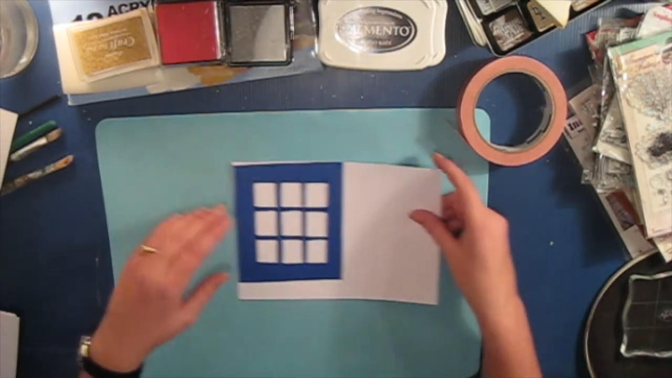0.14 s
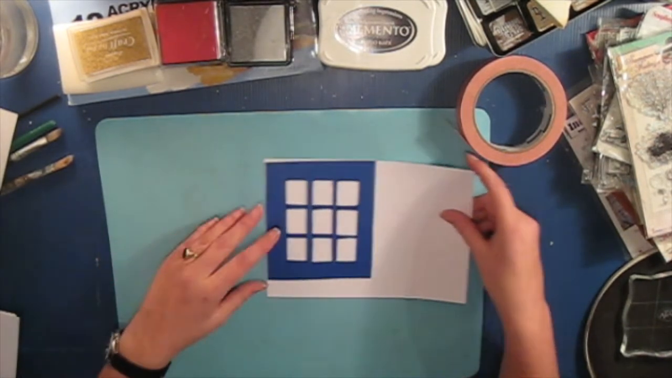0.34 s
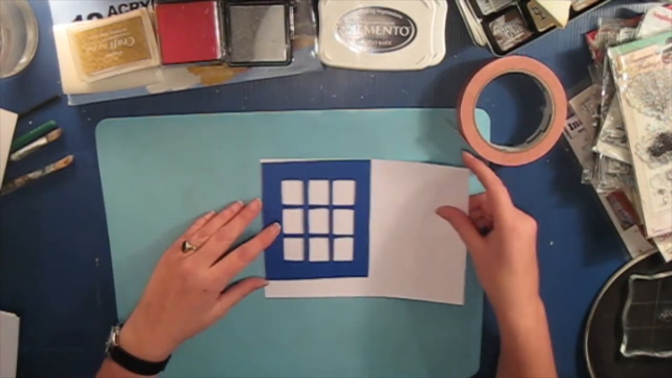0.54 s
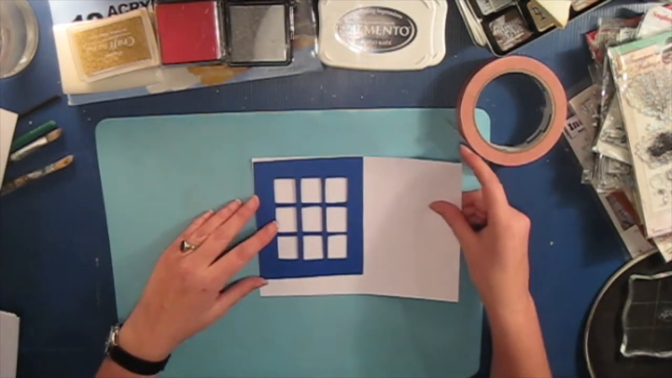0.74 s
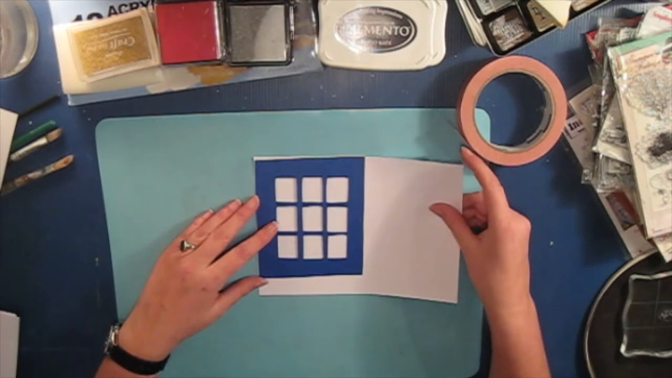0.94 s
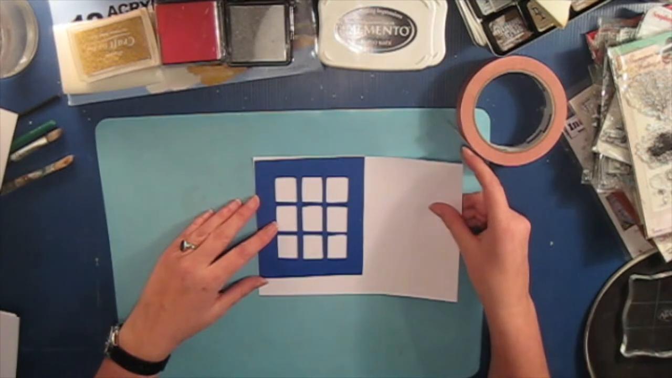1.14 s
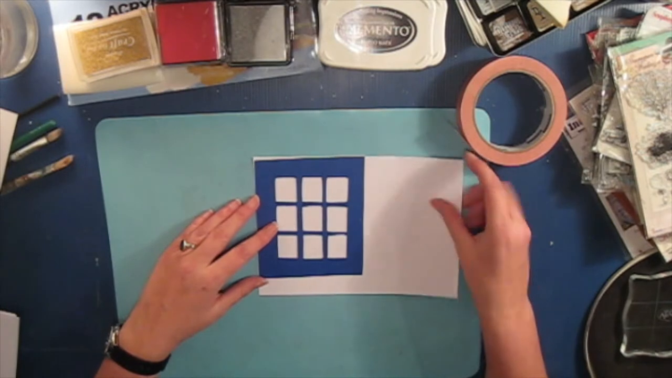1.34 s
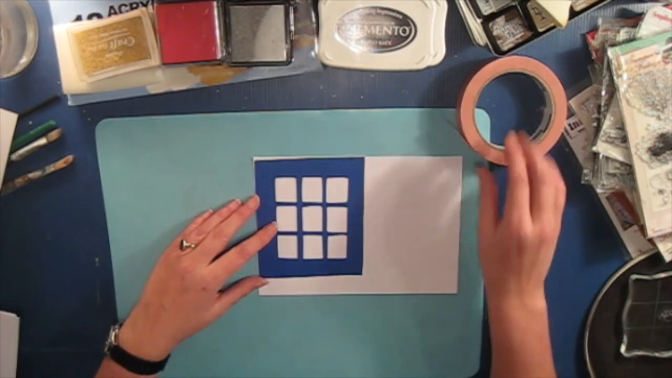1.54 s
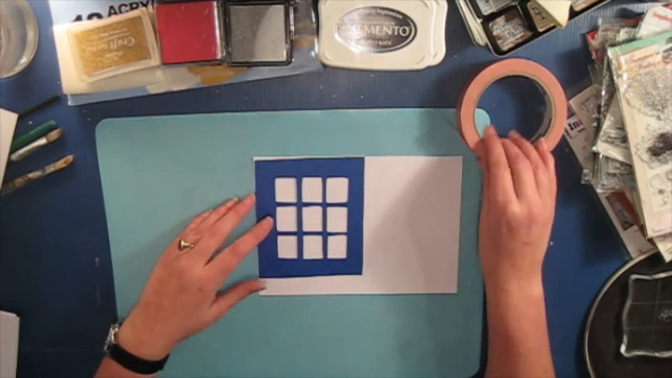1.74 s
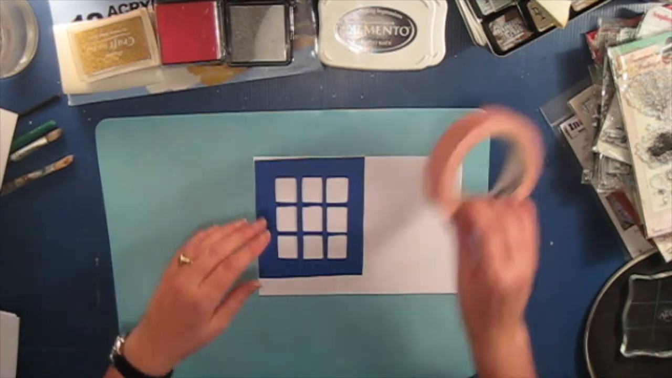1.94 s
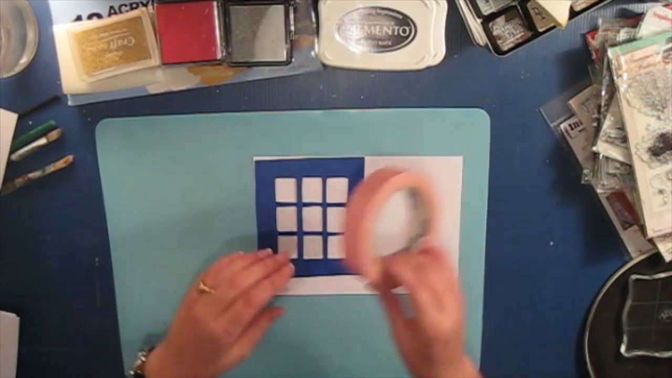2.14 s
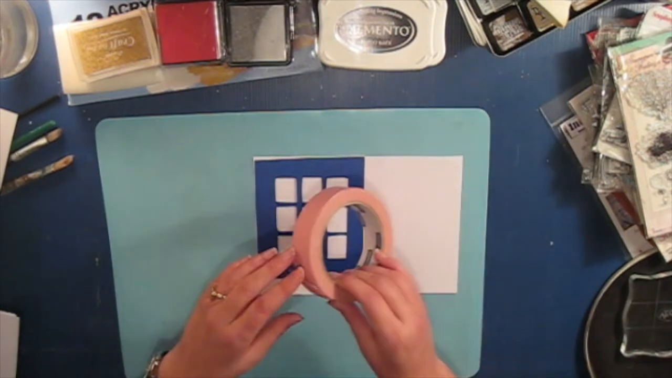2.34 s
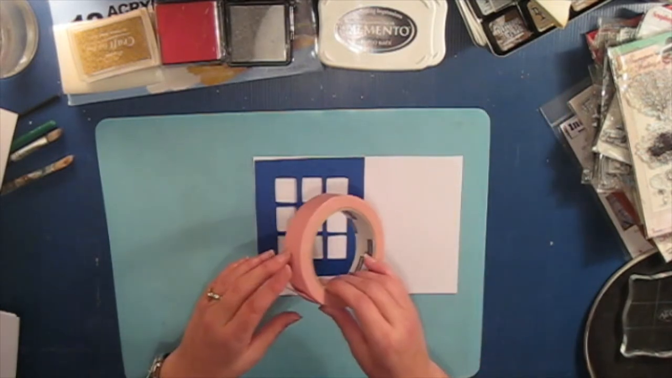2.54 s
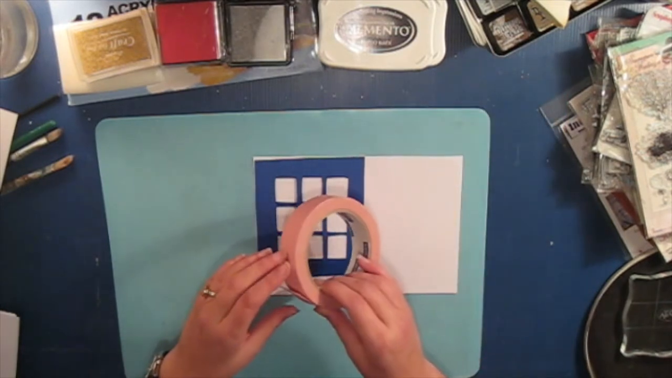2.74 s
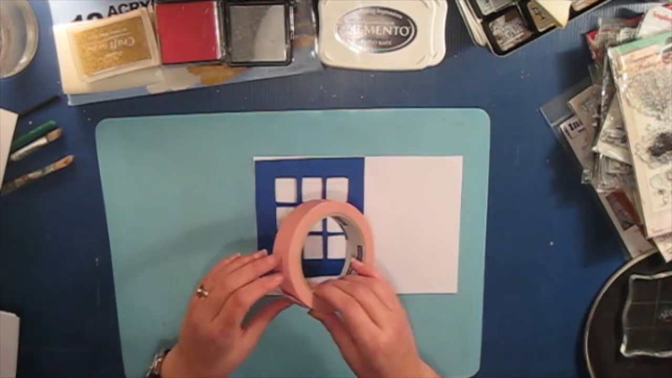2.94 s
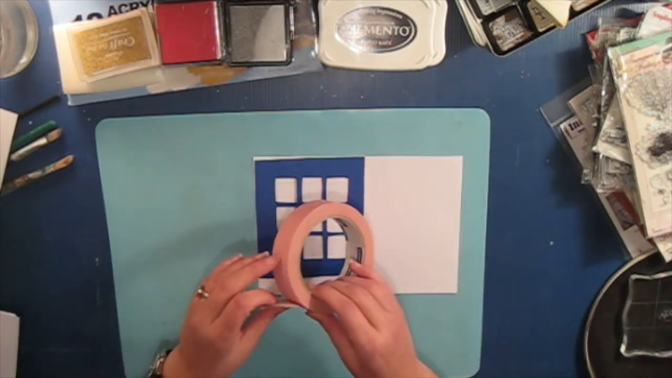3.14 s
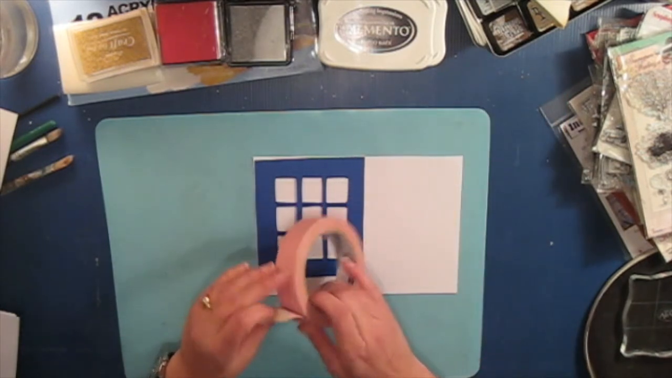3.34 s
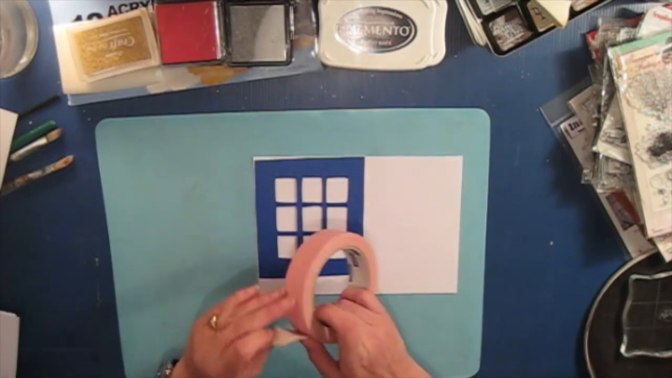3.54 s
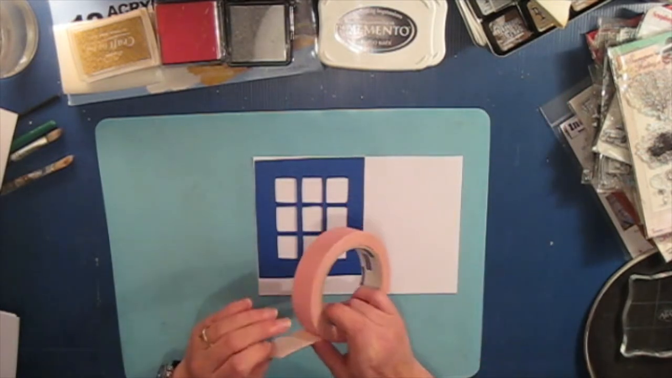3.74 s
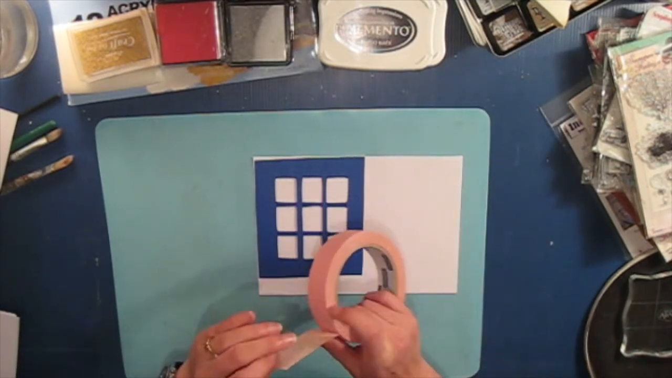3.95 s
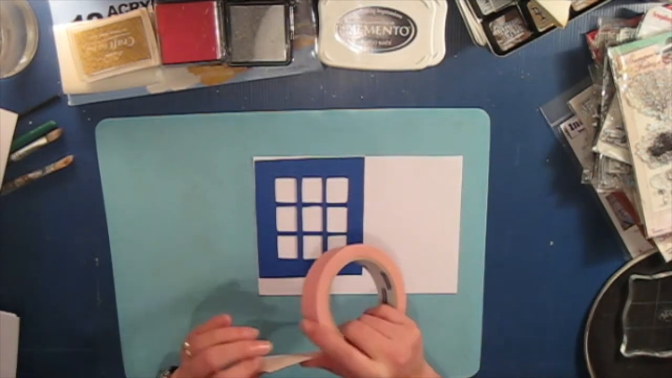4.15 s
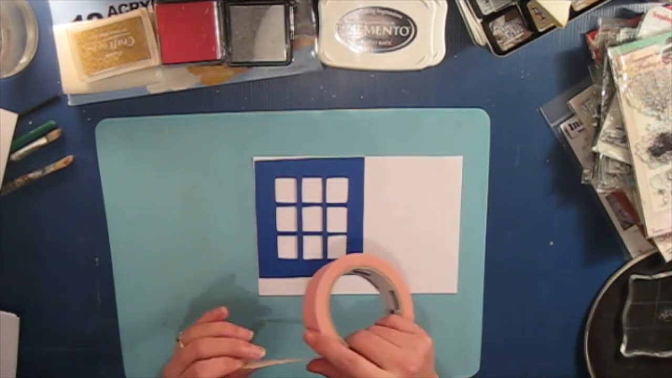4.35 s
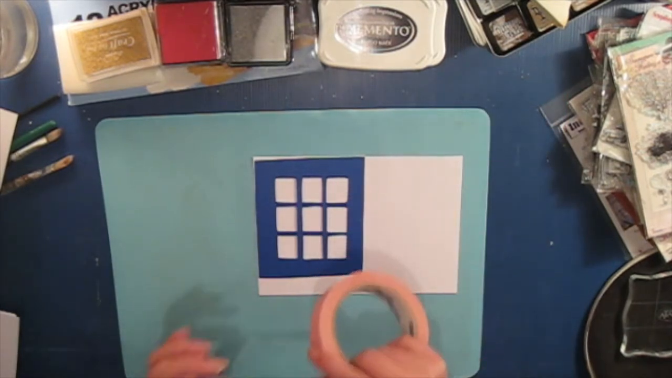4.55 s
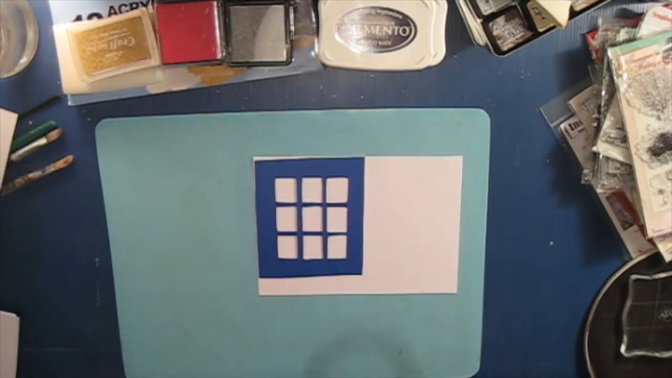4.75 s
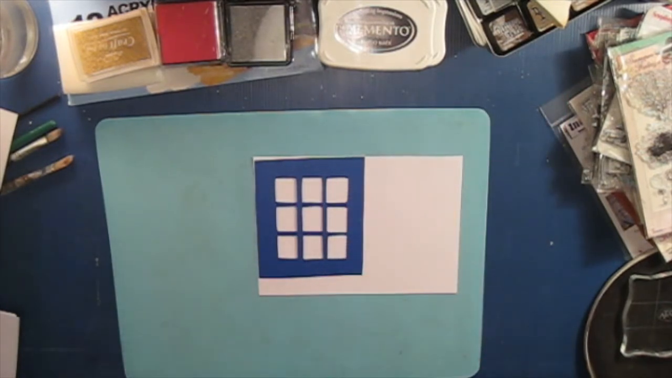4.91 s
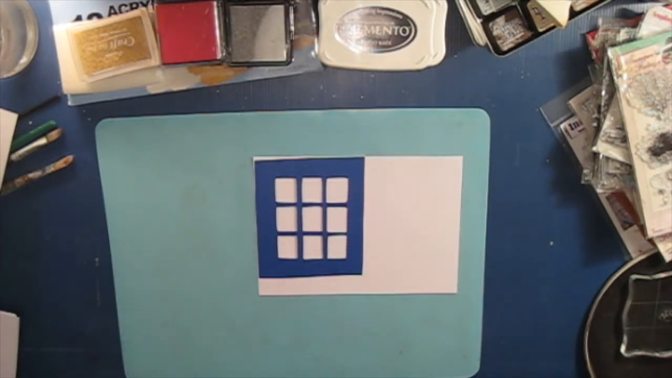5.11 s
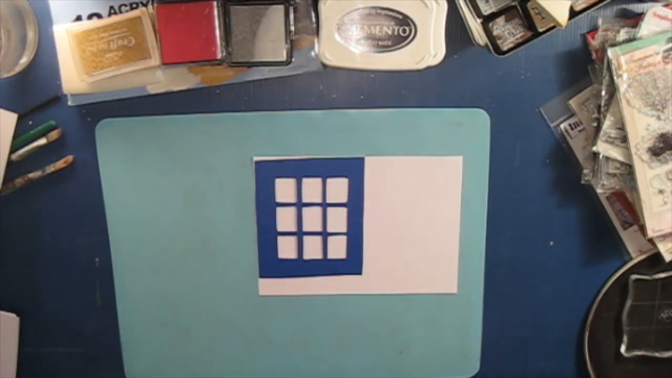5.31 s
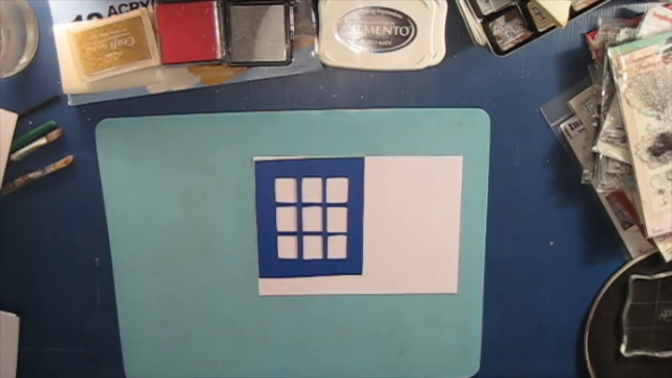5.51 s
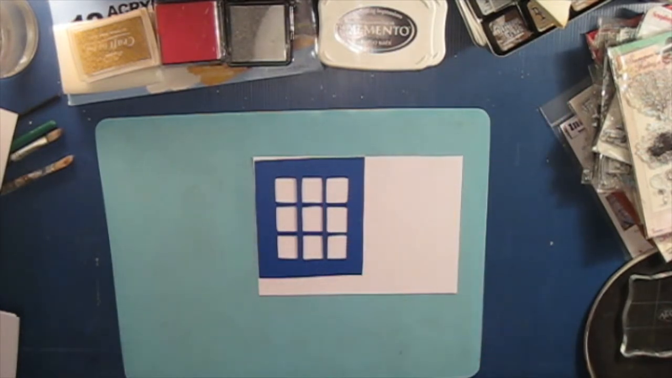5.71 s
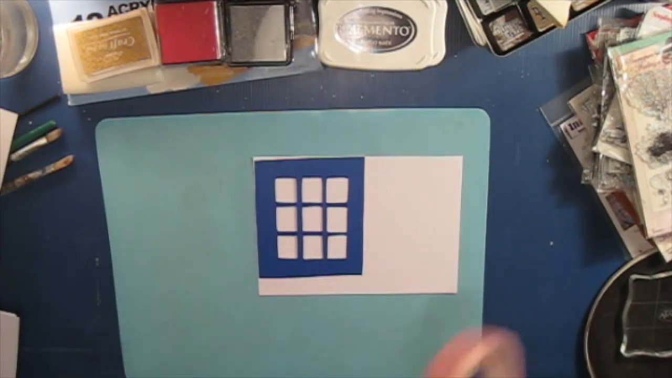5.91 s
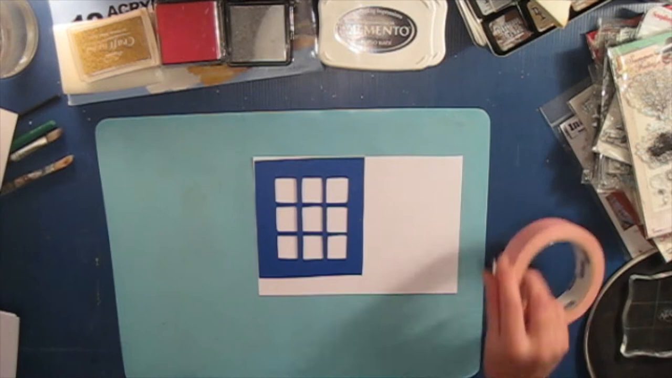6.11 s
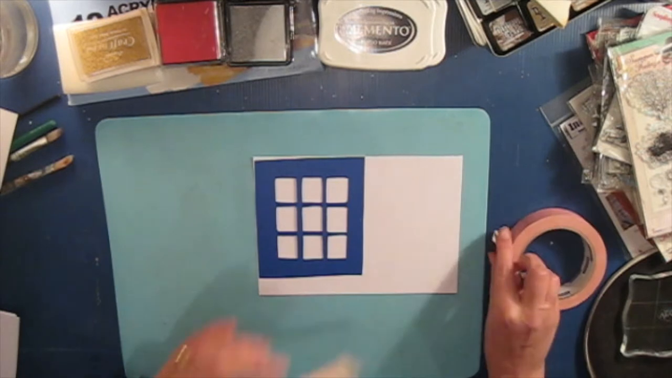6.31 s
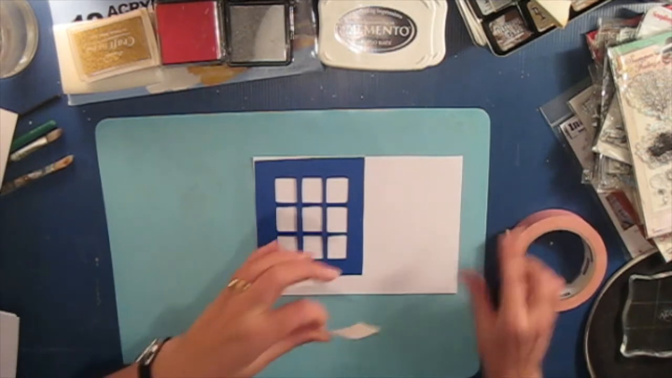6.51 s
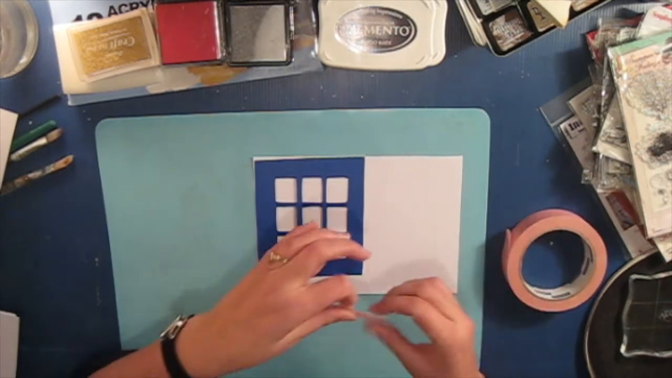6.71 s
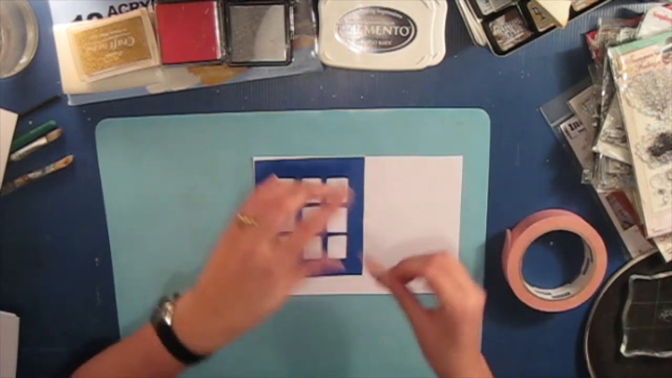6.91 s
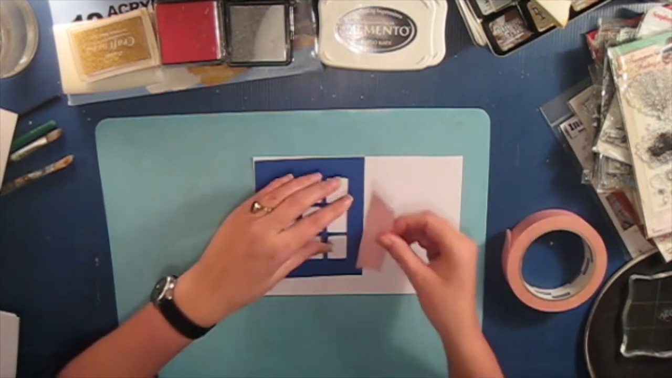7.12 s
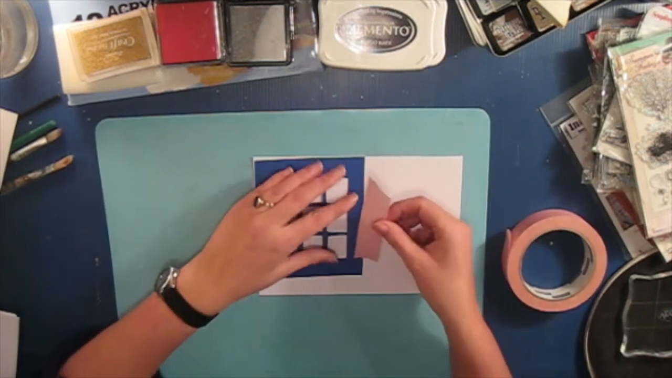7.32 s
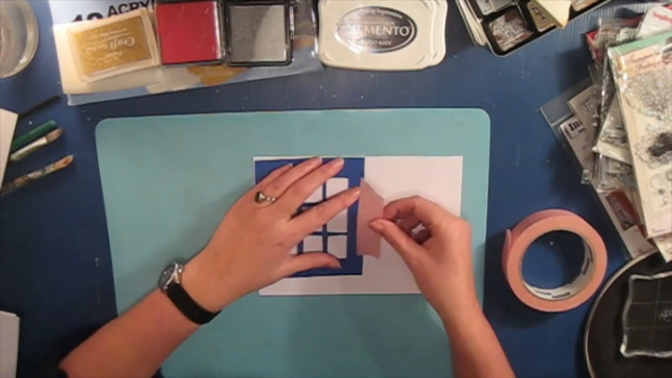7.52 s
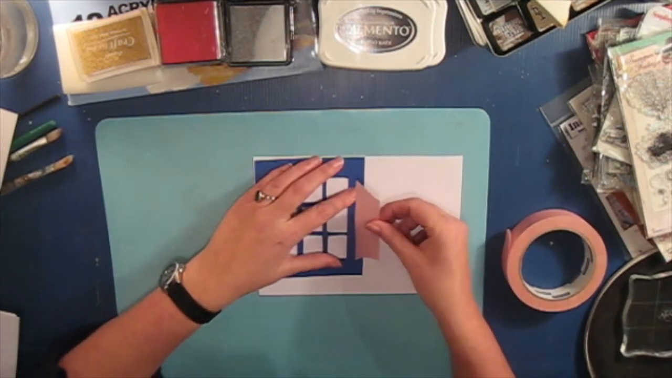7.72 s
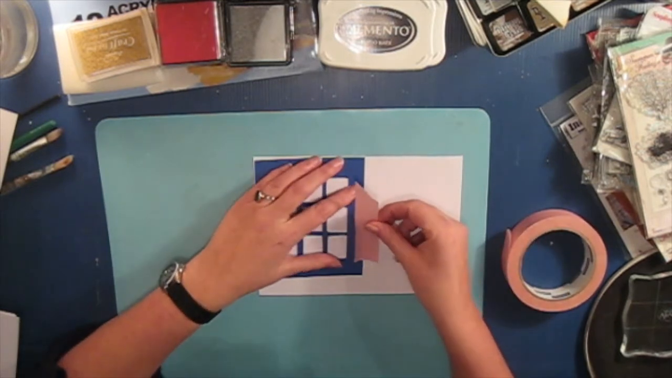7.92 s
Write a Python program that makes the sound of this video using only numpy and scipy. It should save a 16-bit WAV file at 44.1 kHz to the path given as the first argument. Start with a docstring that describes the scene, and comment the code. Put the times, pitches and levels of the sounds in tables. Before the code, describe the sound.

In a small quiet room, a card slides softly over a craft mat with faint finger ticks. After a pause, masking tape snaps loose and peels in uneven crackling jerks. The strip pops and rips off in a short burst, then the roll knocks hard on the table and chatters briefly. Light handling follows. An overhead microphone adds hiss, low rumble and a thin whine.

```python
"""Finger ticks and the soft rub of a card sliding over a craft mat come first, on a desk in a small quiet room.
Masking tape is then picked loose and peeled in crackling jerks: each snap is a sharp release that rings.
The strip drums, pops where its edge is nicked, and tears in a dense rush of breaking fibres.
The roll knocks and chatters on the table as damped modes and small slips; the handling sounds are friction grains.
Rumble, hiss, a faint hum and a thin whine lie beneath, as from a hissy microphone above the desk."""
import sys
import numpy as np
from scipy import signal
from scipy.io import wavfile

SR = 44100
rng = np.random.default_rng(int(sys.argv[2]) if len(sys.argv) > 2 else 0)


def unload_wav(signal):
    """Save mono or channel-first audio to the path in sys.argv[1] as 16-bit WAV at rate SR, clipped to [-1, 1]."""
    wavfile.write(
        sys.argv[1],
        SR,
        np.round(np.clip(np.atleast_2d(signal).T, -1, 1) * 32767).astype(np.int16),
    )


N = 351296
TIME = np.arange(N) / SR
SAMPLES_PER_MS = SR / 1000

# Loud snaps of tape and paper, then a rattle of the roll and a finger tick among the last rows;
# level is energy per ms, run is a series of slips: start_s, level_db, run_s, ring_hz, treble_db
LOUD_SNAPS = [(3.3354, -37, 0.0036, 9900, -6), (3.3628, -31, 0.0021, 8800, -6),
              (3.4096, -18.5, .0006, 4200, -2), (3.4117, -22, 0.0021, 4700, -3),
              (3.4162, -25, 0.0027, 1700, -16), (3.428, -29.5, 0.0023, 1650, -14),
              (3.4593, -36, 0, 4100, -12), (3.4718, -23, 0.0015, 7300, -7), (3.5266, -30.5, .004, 8300, -1),
              (3.5386, -40, 0, 8400, 1), (3.6218, -29, 0.0061, 8000, -4.5), (3.6424, -38, 0.0058, 4100, -2),
              (3.661, -36.5, .007, 3800, 0), (3.7782, -35.5, 0.0034, 3600, -1), (3.8012, -33, 0, 5100, 6),
              (3.808, -27.5, 0.0078, 4900, 1), (3.8309, -37, .001, 5200, 12),
              (3.8994, -36.5, 0.0022, 3900, -2), (3.942, -28.5, 0.0025, 5200, -6),
              (3.9929, -34.5, 0, 4800, -9), (4.0155, -33, 0, 5500, -4), (4.03, -32, 0.0026, 5000, -6),
              (4.0443, -34, 0.0095, 5000, -3), (4.065, -25.5, 0.0066, 4800, -8),
              (4.079, -33.5, .005, 4200, -7), (4.1098, -20, .0008, 3600, -8), (4.138, -29, .006, 6100, -4),
              (4.313, -32, 0.01, 4300, -12), (4.3213, -32.5, 0.00033, 3700, -7),
              (4.34, -36, 0.0023, 5900, -7), (4.358, -22.5, 0.0052, 2030, -11),
              (4.3842, -30, .001, 5700, -13), (4.429, -33, 0.0041, 3800, -12),
              (4.474, -21, 0.0057, 4970, -5), (4.502, -26.5, 0.011, 2100, -8),
              (4.53, -21.5, 0.017, 5100, -7), (4.544, -23.5, 0.0072, 3100, -9),
              (4.553, -20.5, .003, 4600, -20), (4.558, -25, 0.006, 4100, 1), (4.619, -25.5, .012, 3700, -9),
              (4.639, -29.5, 0.0044, 4500, -6), (4.672, -38, .0013, 3100, 1),
              (4.727, -35.5, 0.0043, 3900, -14), (4.7746, -26.5, 0, 3700, -4),
              (4.781, -31, 0.0046, 3800, -4), (4.7962, -21.5, 0.0062, 3700, -1.5),
              (4.8188, -38, .001, 3450, -17), (4.9556, -42, .003, 3300, 0), (5.632, -37.5, .008, 6200, -2),
              (5.6936, -41, 0.0047, 4000, 0), (5.9756, -38, 0.0026, 4200, -24),
              (6.0028, -38, 0.0098, 5200, -11), (6.311, -30, 0.01, 4500, -15),
              (6.3775, -19.5, 0.0043, 4300, -15.5), (6.844, -27, .006, 3380, -17),
              (6.8726, -23, 0.0069, 3100, -30), (6.879, -23, 0.0053, 3400, -8.5)]
# Bass of the snaps and room level behind them, changing over time: time_s, bass_db, room_level_db
SNAP_TONE = [(3.4, -7, -10), (3.65, -1, -9), (3.9, -18, -5.5), (4.14, -15, -8), (4.35, 1, -5),
             (4.58, 4, -7.5), (4.8, -8.5, -10.5), (6.38, -12, -7.5), (6.84, 4.5, -7)]
# Jerks of the pulling hand, with the glue crackle before its trim: start_s, length_s, level_db
PULLS = [(3.792, 0.06, -47), (3.917, .27, -55), (4.267, .15, -45), (4.441, .08, -44.5),
         (4.531, .055, -37.5), (4.603, .09, -43), (4.7, .17, -43.5), (4.848, .15, -56)]
# Source spectrum of a loud snap: frequency_hz, level_db (per Hz)
SNAP_SPECTRUM = [(60, -27), (250, -20), (500, -14.5), (1000, -5.5), (2000, -1), (5000, 0), (7500, 2.5),
                 (10000, 3.5), (13000, 0), (16000, -2.5)]
# Source spectrum of breaking glue threads: frequency_hz, level_db (per Hz)
GLUE_SPECTRUM = [(180, -56), (300, -10), (614, -3), (749, -11), (814, -3.5), (1610, -6), (1750, -2.5),
                 (2700, 1), (4990, -2), (8360, -6), (13500, -20), (16000, -23)]
# Lesser snaps within each pull
SMALL_SNAP_DB, SMALL_SPREAD_DB, SMALL_RUN_S = -38.5, 2, 0.0014
SMALL_RING_HZ, SMALL_TREBLE_DB = 4000, -5.5

# The first short length of strip is jerked free; level before its trim: start_s, level_db
JERKS = [(3.663, -41.5), (3.808, -33.5), (3.943, -44), (4.03, -52), (4.067, -40), (4.11, -40)]
# Modes of the short strip: pitch_hz, level_db, t60_s
STRIP_MODES = [(463, -15, 0.073), (495, 6, 0.065), (1360, 2, 0.089)]
# Nicks in the edge of the taut strip: start_s, level_db, rate_factor (scales pitch and decay rate)
NICKS = [(5.4185, -31, 0.55), (5.4204, -45, 0.95), (5.5572, -13, 0.91), (5.5599, -27, 1)]
# Modes of the nicked edge at rate factor one: pitch_hz, level_db, t60_s
EDGE_MODES = [(1500, 0, 0.00087), (2480, -1, 0.0038), (3300, 6.5, 0.0033), (4200, 6, 0.00086),
              (6100, -8, 0.0039), (11800, -25, 0.0034)]

# Spectrum of the tear as the microphone hears it: frequency_hz, level_db (per Hz)
TEAR_SPECTRUM = [(120, -42), (300, -21), (560, -17), (820, -4), (1400, -4.5), (2200, -3.5), (3600, -2.5),
                 (5700, -0.5), (7300, -3), (8300, -11.5), (11700, -12.5), (16000, -26)]
# The tear bites, eases as it crosses the strip, and ends in a burst of last fibres
TEAR_S, TEAR_LENGTH_S, TEAR_DB = 5.738, 0.0491, -21.5
TEAR_ATTACK_S, TEAR_HOLD_S, TEAR_EASE_DB_PER_S = 0.011, 0.027, 600
LAST_FIBRES_S, LAST_FIBRES_DB = 0.0062, -24.5

# Impacts of the roll on the table: start_s, crack_db, body_db (energy per ms)
KNOCKS = [(6.2319, -5.5, -14.5), (6.2731, -13, -29), (6.2836, -32, -25), (6.2966, -25, -41),
          (6.3005, -36, -42), (6.3160, -35, -36)]
# Modes of the struck cardboard core: pitch_hz, level_db, t60_s
CORE_MODES = [(2420, -18, 0.009), (2830, 6, 0.006), (3200, 5.5, 0.0049), (3550, -1, 0.0095),
              (1825, -18.5, 0.039)]
# Modes of the table top under the roll: pitch_hz, level_db, t60_s
TABLE_MODES = [(115.4, -12, 0.23), (166, -13, .25), (185.6, -12, 0.26), (235.4, -15, 0.36), (406, -6, 0.23),
               (641.5, 5, 0.1), (720, -9, 0.087), (787, -2, 0.13), (840, -6.5, 0.18), (1048, -7.5, 0.11),
               (1280, 6, 0.037)]
# Source spectrum of the scuff in each knock: frequency_hz, level_db (per Hz)
SCUFF_SPECTRUM = [(60, -25), (150, 8.5), (500, -8), (1400, -9), (2700, 0), (4000, -14), (5500, -17),
                  (7500, -39), (10000, -55), (16000, -37)]
# Source spectrum of the chattering roll: frequency_hz, level_db (per Hz)
CHATTER_SPECTRUM = [(60, -34), (160, -6), (450, -2), (850, -2.5), (1450, -8), (1800, -6), (2700, -4),
                    (3700, -10), (4700, -6), (5600, -14), (7500, -29), (16000, -45)]
# Chatter grows by less than one dB for each dB of knock
CHATTER_DB, CHATTER_DB_PER_DB, CHATTER_PEAK_S = -27, 0.46, 0.0098
PUSH_S, PUSH_DB = 0.00085, -8.5  # time scale of the low shove, and its level against the body

# Card and skin sliding on the mat and the roll, before their trim: start_s, length_s, rub_db, fine_db
STROKES = [(-.01, 0.18, -44.5, -50.5), (.11, .2, -47.5, -53), (.27, .1, -50, -54), (0.351, .08, -49.5, -49),
           (.47, .12, -52, -56), (0.546, .14, -49.5, -51), (0.63, .16, -55, -72),
           (1.307, 0.099, -43, -53.5), (1.5, .2, -60, -80), (1.735, .05, -47, -72),
           (1.936, 0.44, -53.5, -72), (4.12, 0.28, -52.5, -72), (5.87, 0.29, -55.5, -69),
           (6.05, 0.34, -56, -57.5), (6.345, 0.084, -41.5, -54), (6.54, 0.23, -58, -80),
           (6.95, 0.42, -58.5, -76)]
# Source spectrum of the soft rub: frequency_hz, level_db (per Hz)
RUB_SPECTRUM = [(200, -31), (800, -11), (1500, -10.5), (2100, -1), (2700, -1), (3600, -3.5), (4600, -7.5),
                (6200, -10), (8500, -22), (16000, -42)]
# Source spectrum of the finer friction hiss: frequency_hz, level_db (per Hz)
FINE_SPECTRUM = [(1500, -48), (4000, 0.5), (6500, 5), (9000, 3), (12000, 2), (16000, -12)]
# Fingers and nails catching on the card and the roll; level is energy per ms, before its trim:
# start_s, level_db, run_s, ring_hz, treble_db
FINGER_TICKS = [(0.058, -35.5, 0.002, 3100, -10), (.134, -41, .001, 2700, -9),
                (.1734, -37.5, .005, 2000, -12), (0.312, -40.5, .003, 3000, 3), (.379, -38, .02, 3800, 3),
                (.9393, -44.5, .009, 3030, 2), (1.351, -34.5, 0.0063, 3020, -12),
                (1.358, -31, 0.005, 2820, -12), (1.3967, -34.5, 0.00087, 2840, -20),
                (1.744, -28, 0.03, 2960, -24), (1.905, -40.5, 0.0042, 4200, -19),
                (3.02, -44.5, .008, 7000, -5), (6.767, -43.5, 0.0076, 2980, -17)]
# Source spectrum of a finger tick: frequency_hz, level_db (per Hz)
CARD_SPECTRUM = [(60, -36), (500, -16), (1200, -7), (2000, -0.5), (2900, -1.5), (3900, 1), (4800, -18),
                 (7000, -19), (8300, 1.5), (12000, -3), (16000, -7)]
CARD_BASS_DB = -4

# Spectrum of the room rumble: frequency_hz, level_db (per Hz)
RUMBLE_SPECTRUM = [(12, -53), (20, -13), (65, -10.5), (119, -5.5), (168, -7), (201, -2.5), (270, -6.5),
                   (291, -4), (323, -7), (386, -3), (700, -7), (910, -31), (1540, -120)]
# Spectrum of the microphone hiss: frequency_hz, level_db (per Hz)
HISS_SPECTRUM = [(400, -23.5), (700, -2.5), (1100, -1.5), (1600, -3.5), (3000, -5.5), (5500, -7.5),
                 (7200, -10), (8300, -11), (11200, -10), (11800, -15.5), (13000, -15.5), (14200, -14),
                 (16000, -17)]
RUMBLE_DB, HISS_DB = -62, -55.5
HUM_HZ, HUM_DB = 300, -71.5
# Electronic whine, with the rate of its phase wander: pitch_hz, level_db, wander_per_s
WHINE = [(7580, -75, 9.6), (7843, -71, 7.9), (7850, -79, 6), (7840, -74.5, 310), (9000, -73, 350)]

# Echoes from the desk and nearby things: delay_s, gain
ECHOES = [(.0012, 0.13), (.0017, -0.081), (.0029, 0.13), (.0063, 0.094), (.0074, -0.14)]
# Decay time of the room: frequency_hz, t60_s
ROOM_T60 = [(150, 0.34), (700, 0.46), (2500, 0.28), (6000, 0.31), (10000, 0.29), (16000, 0.19)]
# Initial spectrum of the room tail: frequency_hz, level_db
ROOM_COLOUR = [(60, -14), (150, 4), (700, 1), (3000, 1.5), (7600, 2.5), (8400, 1.5), (16000, 2.5)]
BAND_LIMIT_HZ = 15850


def loud_snaps():
    """Stick-slip release: stored strain escapes in sharp snaps whose bass changes over time."""
    s, db, run_s, ring_hz, treble_db = np.transpose(LOUD_SNAPS + small_snaps(count=4))
    when, bass_db, _ = np.transpose(SNAP_TONE)
    rows = zip(s, db, run_s, ring_hz, np.interp(s, when, bass_db), treble_db)
    return snaps(rows, SNAP_SPECTRUM, ring_db=7, ring_width=.3, patchy_db=2.2, flutter=.55, flutter_s=.0009)


def small_snaps(count, follow=0.63):
    """Random release: lesser snaps crowd the middle of each pull, stronger in the harder pulls."""
    mean_db = np.mean([db for _, _, db in PULLS])
    rows = []
    for start, length, pull_db in PULLS:
        for _ in range(count):
            effort_db = follow * (pull_db - mean_db)
            db = SMALL_SNAP_DB + effort_db + SMALL_SPREAD_DB * rng.standard_normal()
            s = start + length * rng.triangular(0, .5, 1)
            rows.append((s, db, SMALL_RUN_S, SMALL_RING_HZ, SMALL_TREBLE_DB))
    return rows


def snaps(rows, spectrum, ring_db, ring_width, patchy_db, flutter, flutter_s, size=900):
    """Impulsive excitation: a sharp release, or a short run of them, rings at a resonance."""
    out, hz, t = np.zeros(N), bins(), np.arange(size) / SR
    for s, db, run_s, ring_hz, bass_db, treble_db in rows:
        tilt = read([(1200, bass_db), (2400, 0), (4200, 0), (10000, treble_db)], hz)
        ring = ring_db / (1 + ((hz - ring_hz) / (ring_width * ring_hz)) ** 2)
        shape_db = read(spectrum, hz) + tilt + ring
        # the surface shivers briefly after it lets go
        release = flutter * unit(rng.standard_normal(size) * np.exp(-t / flutter_s))
        release[0] += 1
        snap = unit(signal.fftconvolve(release, impulse(shape_db + patchy_db * ripple())))
        # a run crosses three spots; the longer it lasts, the more it outweighs the first release
        for slips in rng.standard_normal((3, size)):
            run = slips ** 3 * np.exp(-(t / max(run_s, 1 / SR)) ** 4)
            spot = impulse(shape_db + patchy_db * ripple())
            snap += np.sqrt(max(run_s, 0) / 0.0024) * unit(signal.fftconvolve(run, spot))
        add(out, s, amp(db) * np.sqrt(SAMPLES_PER_MS) * unit(snap))
    return out


def peel():
    """Adhesive fracture: breaking glue threads crackle louder as the hand pulls faster, with uneven swells."""
    speed = np.zeros(N)
    for start, length, db in PULLS:
        speed += amp(db) * gesture(start, length, skew=0.89, power=0.52)
    crackle = grains(speed, GLUE_SPECTRUM, per_s=1200, spread_db=2.5, patchy_db=1)
    return amp(-3.0) * crackle * amp(1.7 * wander(130))


def strip(size=8000):
    """Free vibration: the stretched strip drums when jerked, and pops when its edge is nicked."""
    out, t = np.zeros(N), np.arange(size) / SR
    for s, db in JERKS:
        add(out, s, amp(db - 2.0) * ringing(STRIP_MODES, t))
    for s, db, rate in NICKS:
        pop = ringing(EDGE_MODES, t * rate) * (1 - np.exp(-t / .00005))
        add(out, s, amp(db) * unit(high_pass(pop, hz=700)))
    return np.sqrt(SAMPLES_PER_MS) * out


def tear():
    """Cumulative fracture: paper fibres break in a dense rush, then a last burst."""
    age = TIME - TEAR_S
    bite = np.clip(age / TEAR_ATTACK_S, 0, 1) ** 2
    ease_db = TEAR_EASE_DB_PER_S * np.maximum(age - TEAR_HOLD_S, 0)
    rush = bite * amp(TEAR_DB - ease_db) * (age < TEAR_LENGTH_S)
    last_start = TEAR_S + TEAR_LENGTH_S - LAST_FIBRES_S
    last = amp(LAST_FIBRES_DB) * gesture(last_start, LAST_FIBRES_S, skew=1, power=2.2)
    fibres = grains(rush + last, TEAR_SPECTRUM, per_s=4500, spread_db=-1.5, patchy_db=1.0, count=16)
    return fibres * amp(2.2 * wander(500))


def roll(size=22000):
    """Impact and modal response: each knock shoves the table, rings it and the core, and sets off chatter."""
    t = np.arange(size) / SR
    out = grains(chatter(), CHATTER_SPECTRUM, per_s=1500, spread_db=0.5, patchy_db=-1, count=5)
    for s, crack_db, body_db in KNOCKS:
        scuff = unit(colour(rng.standard_normal(size) * np.exp(-t / 0.0033), SCUFF_SPECTRUM))
        core = unit(ringing(CORE_MODES, t) * (1 - np.exp(-t / 0.00048)))
        crack = unit(core + amp(-8.5) * scuff)
        table = unit(ringing(TABLE_MODES, t) * (1 - np.exp(-t / 0.0027)))
        push = unit(np.sin(t / PUSH_S) * np.exp(-t / PUSH_S / np.pi))
        body = table + amp(PUSH_DB) * push
        add(out, s, np.sqrt(SAMPLES_PER_MS) * (amp(crack_db) * crack + amp(body_db) * body))
    return high_pass(out, hz=97)


def chatter():
    """Repeated contact: the rattle wells up after each knock and dies away, and energies add."""
    energy = np.zeros(N)
    age = np.arange(SR // 5) / SR / CHATTER_PEAK_S  # in units of the time to peak
    for s, _, body_db in KNOCKS:
        level = amp(CHATTER_DB + CHATTER_DB_PER_DB * body_db)
        add(energy, s, (level * age * np.exp(1 - age)) ** 2)
    return np.sqrt(energy)


def slide():
    """Dry friction: a soft rub with a finer hiss on top, both catching unevenly."""
    rub_gain, fine_gain = np.zeros((2, N))
    for start, length, rub_db, fine_db in STROKES:
        speed = gesture(start, length, skew=0.79, power=0.94)
        rub_gain += amp(rub_db) * speed
        fine_gain += amp(fine_db) * speed
    rub = grains(rub_gain, RUB_SPECTRUM, per_s=3500, spread_db=2.0, patchy_db=-1.5, count=4)
    fine = grains(fine_gain, FINE_SPECTRUM, per_s=5000, spread_db=3.5, patchy_db=1.5, count=4)
    return amp(-2.5) * (rub + fine) * amp(1.5 * wander(70))


def finger_ticks():
    """Catch and release: nails let go suddenly and ring the card."""
    rows = [(s, db, run_s, ring_hz, CARD_BASS_DB, treble_db)
            for s, db, run_s, ring_hz, treble_db in FINGER_TICKS]
    ticks = snaps(rows, CARD_SPECTRUM, ring_db=12.5, ring_width=0.14, patchy_db=0.5,
                  flutter=0.95, flutter_s=0.0023)
    return amp(-0.5) * ticks


def background():
    """Stationary noise and tones: room rumble, microphone hiss, faint mains hum and electronic whine."""
    out = amp(RUMBLE_DB) * colour(rng.standard_normal(N), RUMBLE_SPECTRUM)
    out += amp(HISS_DB) * colour(rng.standard_normal(N), HISS_SPECTRUM)
    out += amp(HUM_DB) * evened(np.sin(2 * np.pi * HUM_HZ * TIME + 0.32 * wander(4.1)))
    for hz, db, wander_per_s in WHINE:
        out += amp(db) * evened(np.sin(2 * np.pi * hz * TIME + 2 * wander(wander_per_s)))
    return out


def room(x, wet_db, size=26000):
    """Reverberation: close echoes, and a diffuse tail that decays at a different rate at each frequency."""
    hz, t, z = signal.stft(rng.standard_normal(size), SR, nperseg=256)
    z = z * amp(read(ROOM_COLOUR, hz)[:, None] - 60 * t / read(ROOM_T60, hz)[:, None])
    tail = signal.istft(z, SR)[1]
    tail *= 1 - np.exp(-np.arange(len(tail)) / SR / 0.002)  # the tail builds up gradually
    out = x + signal.fftconvolve(amp(wet_db) * x, unit(tail))[:N]
    for delay_s, gain in ECHOES:
        add(out, delay_s, gain * x)
    return out


def grains(gain, spectrum, per_s, spread_db, patchy_db, count=10):
    """Granular excitation: tiny uneven slips under a gain curve, coloured by the spot each comes from."""
    size = amp(spread_db * np.minimum(rng.exponential(1, N), 4)) * rng.choice([-1, 1], N)
    slips = size * (rng.random(N) < per_s / SR)
    spot, live = rng.integers(0, count, N), np.flatnonzero(gain)
    crackle = 0
    for k in range(count):
        click = impulse(read(spectrum, bins()) + patchy_db * ripple())
        crackle = crackle + signal.oaconvolve(slips[live] * (spot[live] == k), click)
    out = np.zeros(N)
    out[live] = gain[live] * evened(crackle[:len(live)])
    return out


def ringing(modes, t, spread=0.00067):
    """Modal superposition: one blow sets off damped modes, each slightly detuned."""
    hz, db, t60 = np.transpose(modes)[:, :, None]
    detune = 1 + spread * rng.standard_normal(hz.shape)
    return unit((amp(db - 60 * t / t60) * np.cos(2 * np.pi * hz * detune * t)).sum(0))


def gesture(start, length, skew, power):
    """Kinematics: speed of one movement from rest to rest; a skew under one peaks early."""
    u = np.clip((TIME - start) / length, 0, 1)
    moving = (u > 0) & (u < 1)
    out = np.zeros(N)
    out[moving] = np.sin(np.pi * u[moving] ** skew) ** power
    return out


def wander(per_s, size=N):
    """Random modulation: straight lines join unit-variance normal values drawn at this rate."""
    knots = rng.standard_normal(size // 16)
    return np.interp(np.arange(size) / SR * per_s, np.arange(len(knots)), knots)


def ripple(size=26):
    """Local resonance: random broad peaks and dips in the spectrum of one spot."""
    return np.interp(bins(), np.linspace(0, SR / 2, size), rng.standard_normal(size))


def high_pass(x, hz):
    """Radiation efficiency: small surfaces radiate no deep bass."""
    return signal.sosfilt(signal.butter(3, hz, "high", fs=SR, output="sos"), x)


def colour(x, spectrum):
    """Linear filtering: a causal response shapes the spectrum, scaled to an rms of one."""
    return evened(signal.oaconvolve(x, impulse(read(spectrum, bins(size=8192))))[:len(x)])


def impulse(db):
    """Minimum phase: the sharpest causal click with this spectrum."""
    mirrored_db = np.r_[db, db[-2:0:-1]]
    log_gain = np.log(amp(np.maximum(mirrored_db, -100)))
    return unit(np.fft.ifft(np.exp(np.conj(signal.hilbert(log_gain)))).real)


def bins(size=2048):
    """Discrete spectrum: the frequencies on which impulse colours are drawn."""
    return np.fft.rfftfreq(size, 1 / SR)


def read(points, hz):
    """Logarithmic pitch scale: interpolates a table on a log-frequency axis."""
    f, value = np.transpose(points)
    return np.interp(np.log(hz + 1), np.log(f + 1), value)


def amp(db):
    """Level: converts decibels to an amplitude ratio."""
    return 10 ** (np.asarray(db) / 20)


def unit(x):
    """Energy normalisation: scales to an energy of one."""
    return x / np.sqrt(np.sum(x ** 2) + 1e-20)


def evened(x):
    """Power normalisation: scales to an rms of one."""
    return unit(x) * np.sqrt(len(x))


def add(mix, s, sound):
    """Superposition: mixes a sound in at a time in seconds."""
    part = mix[round(s * SR):][:len(sound)]
    part += sound[:len(part)]


def scene():
    """Superposition in a room: each group of sources has its own reverberant level."""
    when, _, room_level_db = np.transpose(SNAP_TONE)
    peeling = room(loud_snaps() + peel(), wet_db=np.interp(TIME, when, room_level_db))
    tearing = room(tear(), wet_db=-9) + room(strip(), wet_db=-11.5)
    landing = room(roll(), wet_db=-10)
    handling = room(finger_ticks() + slide(), wet_db=-10)
    return (peeling + tearing + landing + handling + background())[None]


def record(dry):
    """Saturation and band limiting: peaks bend under the recorder's ceiling, then a low-pass filter."""
    ceiling = .5
    held = dry / (1 + (dry / ceiling) ** 12) ** (1 / 12)
    low_pass = signal.firwin(601, BAND_LIMIT_HZ, window=("kaiser", 9), fs=SR)
    return signal.oaconvolve(held, low_pass[None], "same")


dry = scene()
out = record(dry)
unload_wav(out)
```